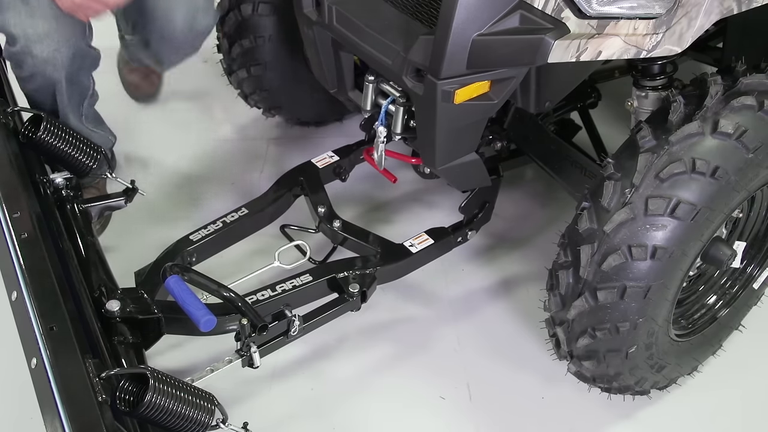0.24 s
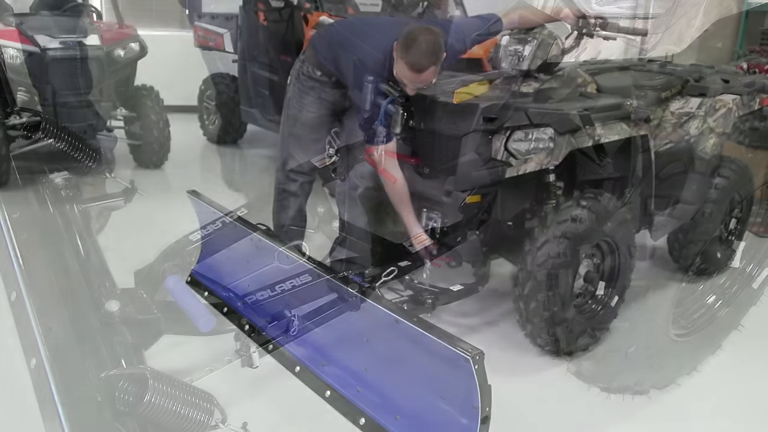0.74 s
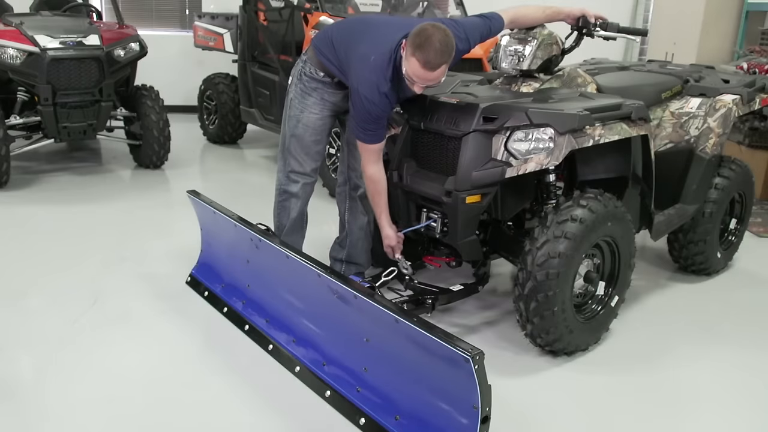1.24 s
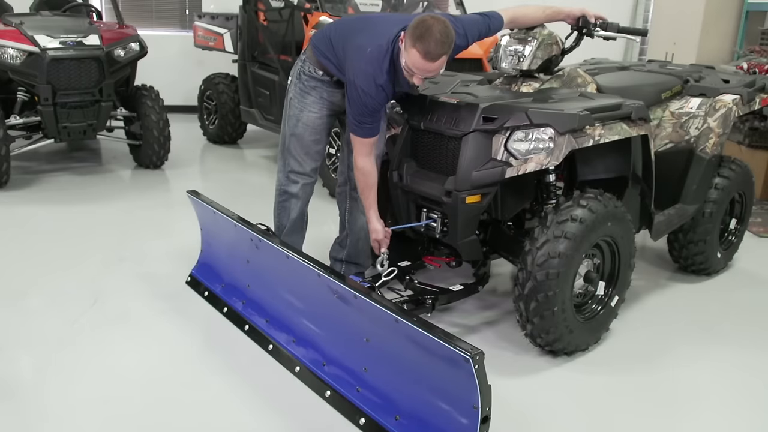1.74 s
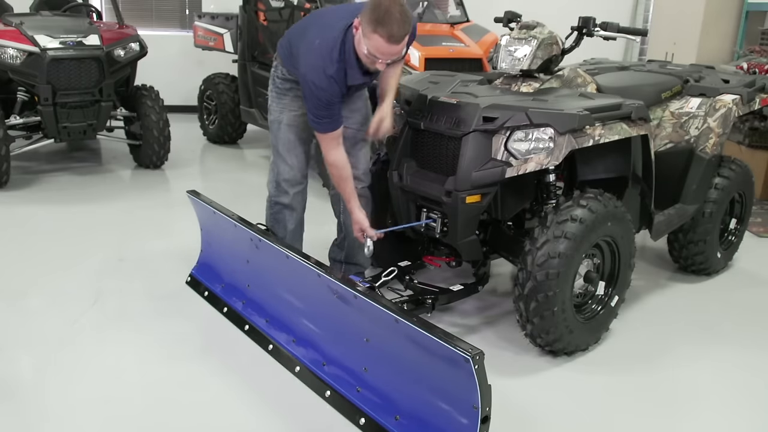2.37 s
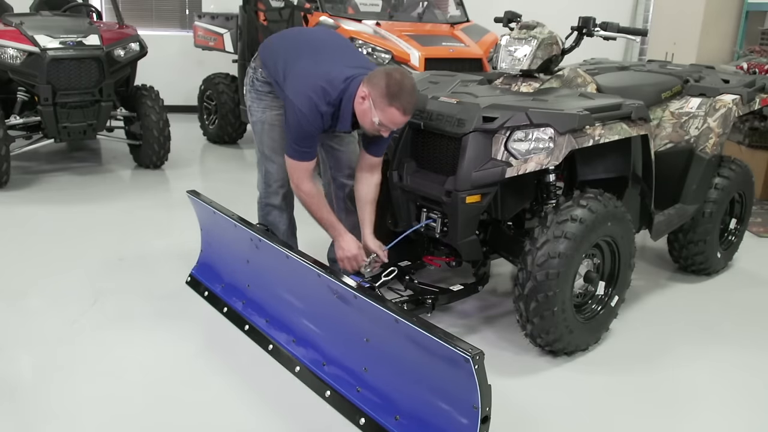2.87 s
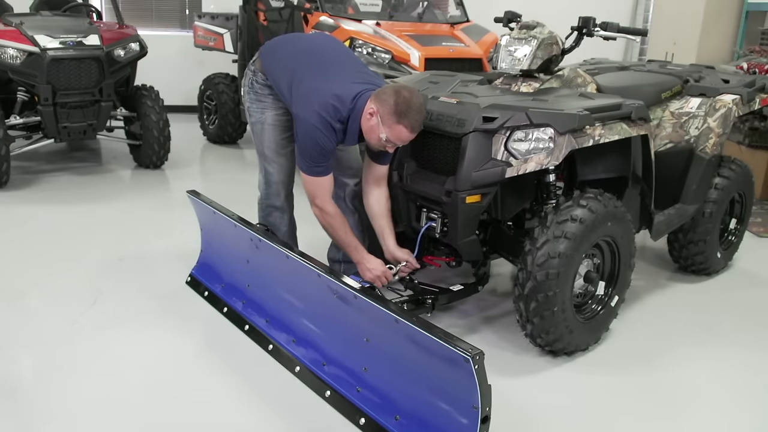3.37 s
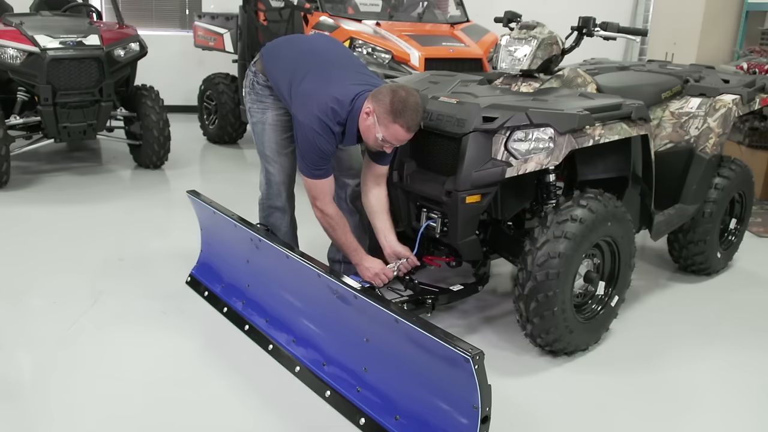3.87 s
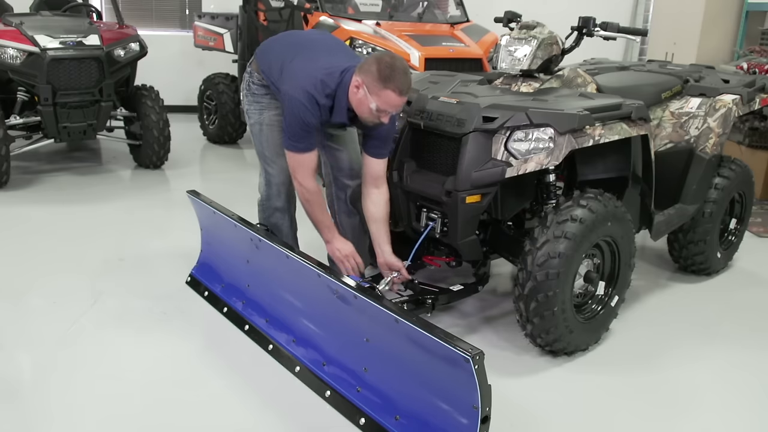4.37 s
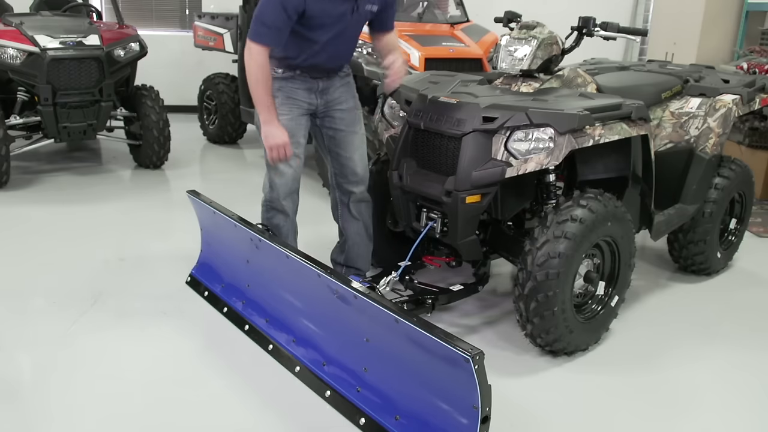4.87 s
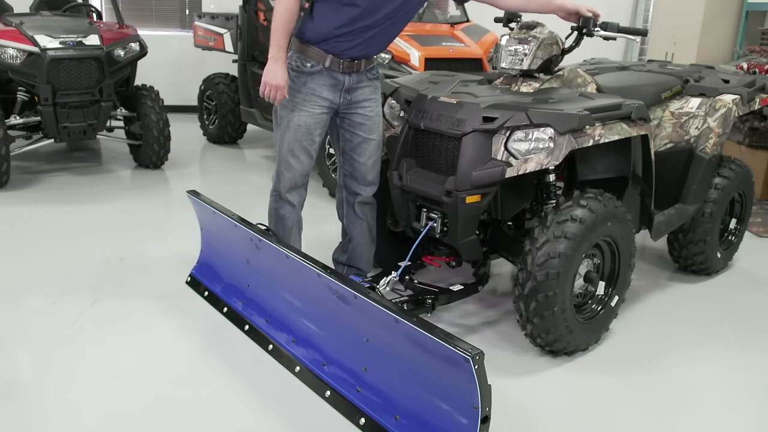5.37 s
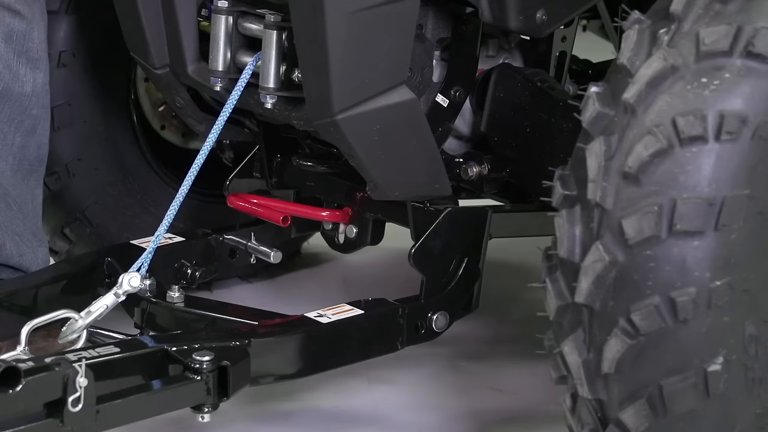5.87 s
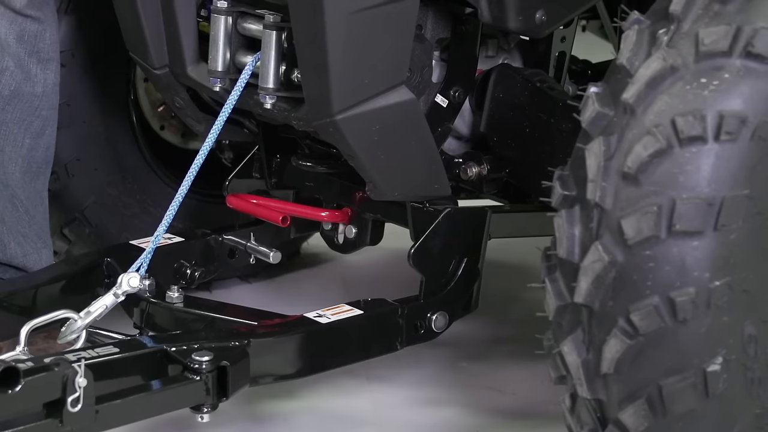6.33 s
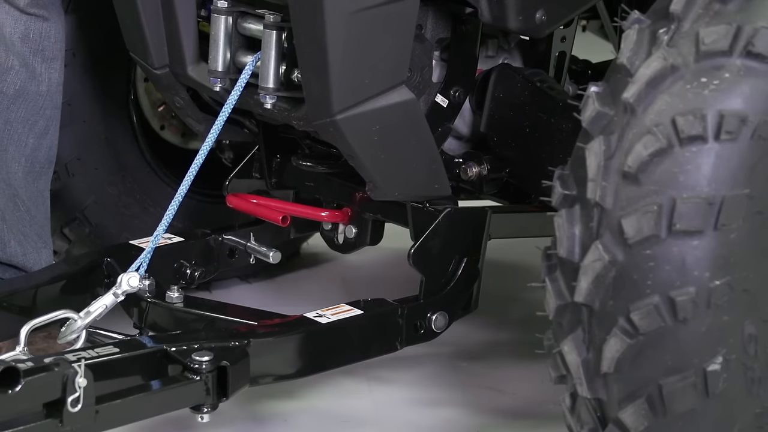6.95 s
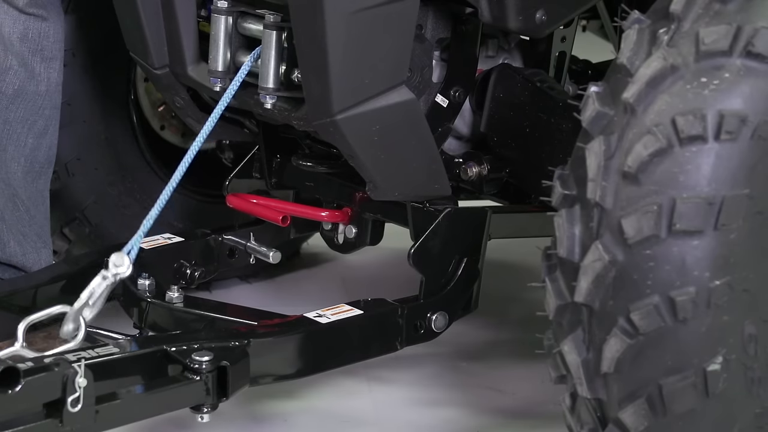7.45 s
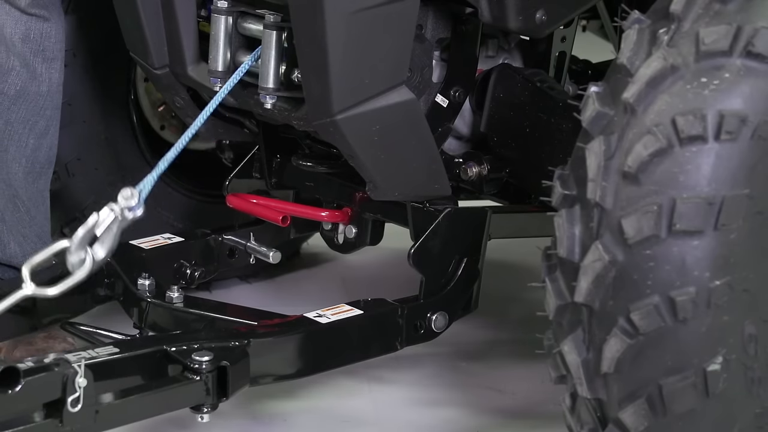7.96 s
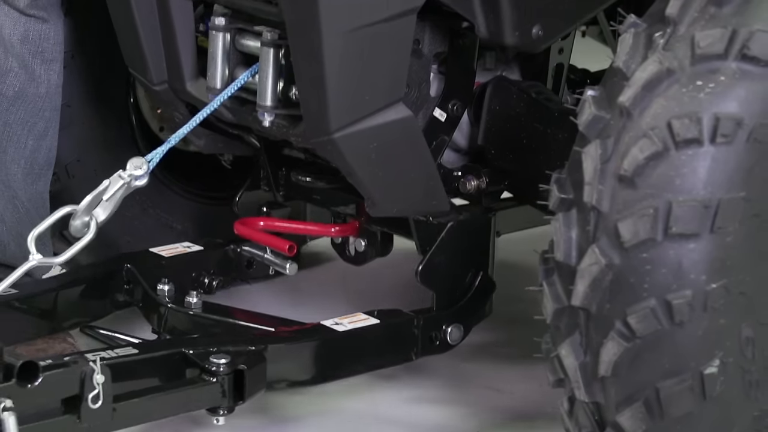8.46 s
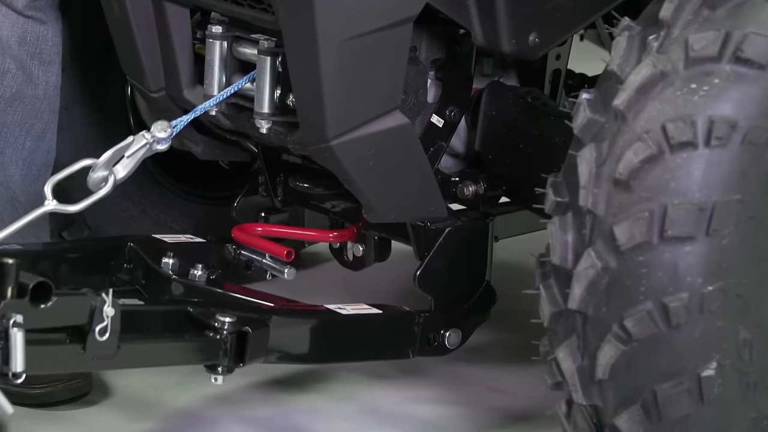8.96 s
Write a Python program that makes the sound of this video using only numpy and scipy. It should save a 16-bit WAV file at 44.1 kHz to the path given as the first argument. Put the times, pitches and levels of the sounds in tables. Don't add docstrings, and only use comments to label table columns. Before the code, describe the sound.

Ventilation rumbles while a winch motor whines and chatters, metal hook clanks and jingles, shoes shuffle, and the winch growls again under load.

```python
import sys
import numpy as np
from scipy import signal
from scipy.fft import rfft, irfft, next_fast_len
from scipy.io import wavfile
from scipy.ndimage import uniform_filter1d

SR = 44100
rng = np.random.default_rng(int(sys.argv[2]) if len(sys.argv) > 2 else 0)


def bounce(signal):
    frames = np.transpose(np.atleast_2d(signal))
    limited = np.clip(frames, -1, 1)
    pcm = np.round(limited * 32767).astype(np.int16)
    wavfile.write(sys.argv[1], SR, pcm)


def invert_db(level):
    return 10 ** (np.asarray(level, dtype=float) / 20)


N = 405719
T, SIZE = np.arange(N) / SR, next_fast_len(N)
HZ = np.fft.rfftfreq(SIZE, 1 / SR)


def evened(x):
    return x / np.sqrt(np.mean(x ** 2) + 1e-20)


def read(points, hz):
    f, value = np.transpose(points)
    return np.interp(np.log(hz + 1), np.log(f + 1), value)


def during(start, stop, rise=0.004, fall=0.008):
    return np.clip(np.minimum((T - start) / rise, (stop - T) / fall), 0, 1)


def coloured(db, x=None):
    source = rng.standard_normal(SIZE) if x is None else x
    return evened(irfft(rfft(source, SIZE) * invert_db(db), SIZE)[:N])


def band(lo_hz, hi_hz, ripple_db=0.0):
    edges_db = -10 * np.log10((1 + (lo_hz / (HZ + 1)) ** 8) * (1 + (HZ / hi_hz) ** 8))
    if not ripple_db:
        return coloured(edges_db)
    ripples = rng.standard_normal((2, len(HZ)))
    ripples = uniform_filter1d(uniform_filter1d(ripples, size=400), size=400)
    turn = 2 * np.pi * 1.3 * T
    shares = [np.cos(turn), np.sin(turn)]
    return sum(share * coloured(edges_db + ripple_db * evened(r)) for share, r in zip(shares, ripples))


def slow(rate_hz):
    knots = rng.standard_normal(int(N / SR * 200) + 2)
    smooth = uniform_filter1d(knots, max(1, round(100 / rate_hz)))
    return evened(np.interp(T * 200, np.arange(len(knots)), smooth))


def rung(drive, modes, uneven_db=0.0):
    out, shake = np.zeros(N), drive * rng.standard_normal(N)
    for hz, db, t60 in modes:
        r = np.exp(-np.log(1000) / (t60 * SR))
        angle = 2 * np.pi * hz / SR
        push = shake * invert_db(db + uneven_db * slow(8.2))
        gain = 2 * np.sqrt(1 - r * r) * np.sin(angle)
        out += signal.lfilter([gain], [1, -2 * r * np.cos(angle), r * r], push)
    return out / np.sqrt(2 * len(modes))


def add(mix, s, db, t60, rise=0.0012):
    part = mix[..., round(s * SR) - 40:][..., :round(0.3 * SR)]
    t = T[:part.shape[-1]]
    part += invert_db(np.asarray(db)[..., None] - 60 * t / t60) * (1 - np.exp(-(t / rise) ** 2))


# frequency in Hz, level in dB per Hz.
RUMBLE = [(15, -50), (25, -24.5), (48, -0.5), (129, -1), (456, -12.5), (2150, -30), (5000, -41),
          (11000, -120)]
# frequency in Hz, level in dB per Hz.
HISS = [(530, -23.5), (900, 0), (1720, -5.5), (2910, -5.5), (4940, -6), (10100, -8.5), (14500, -10.5),
        (15800, -14.5)]
# middle in seconds, half length in seconds, level in dB.
RUSTLE = [
    (0.15, 0.12, -59.5),
    (2.44, 0.085, -68),
    (2.655, 0.11, -64),
    (3.1, 0.5, -74),
    (4.597, 0.39, -72),
    (5.619, 0.06, -75),
    (6.002, 0.072, -74),
    (6.258, 0.053, -78.5),
    (6.511, 0.16, -75),
]
RUMBLE_DB, STILL_DB = -54, -71


def background():
    rumble = invert_db(RUMBLE_DB + 1.4 * slow(6.6)) * coloured(read(RUMBLE, HZ))
    flicker_db = 1.2 * slow(30)
    cloth = invert_db(STILL_DB) + sum(invert_db(db) * np.exp(-((T - s) / half) ** 4) for s, half, db in RUSTLE)
    return rumble + cloth * invert_db(flicker_db) * coloured(read(HISS, HZ))


TAUT_S, TAKE_UP_S, SETTLE_S = 8.2, 0.27, 0.086


def strain():
    load = np.clip((T - TAUT_S) / TAKE_UP_S, 0, 1)
    return load, load ** 2 * np.exp(-np.maximum(T - TAUT_S - TAKE_UP_S, 0) / SETTLE_S)


# start in seconds, stop in seconds, fade-in in seconds, gear whirr in dB, low growl in
# dB.
RUNS = [
    (0.21, 1.91, 0.6, -37, -36),
    (6.995, 8.945, 0.011, -37, -37),
]
# frequency in Hz, level in dB per Hz.
WHIRR = [
    [(710, -45.5), (1200, -31), (1730, 4), (2840, -1.5), (3070, -5), (3310, -0.5), (6450, 3.5),
     (15800, -19)],
    [(710, -38), (1200, -5.5), (2300, -12.5), (3500, -4.5), (4300, -1.5), (6600, -2), (9720, -7),
     (15800, -25.5)],
]
# frequency in Hz, level in dB per Hz.
GROWL = [(26, -45), (45, -3), (190, 1), (555, -1.5), (1100, -9), (1760, -10), (2600, -16.5), (5720, -110)]
# frequency in Hz, width in Hz, lift in dB paying out, lift in dB reeling in.
HOUSING = [(1027, 230, 9, 7.5), (1790, 180, 1, 5), (2997, 120, 8, 5), (3990, 130, 7, 3.5),
           (4420, 130, 6.5, 7), (5060, 260, 8.5, 6.5), (2650, 400, -1, -4), (5700, 350, -1, -4),
           (6300, 220, 2, 8), (6550, 150, 1.5, 8), (7380, 70, 9, 10.5), (7700, 150, -2, 3),
           (8470, 41, 4, 3), (9140, 91, -2, -3.5)]
# multiple of shaft speed, level in dB re growl.
ORDERS_DB = [(1, -4), (3, -12), (4, -11), (6, -9), (7, -10), (8, -13), (16, -8)]
FREE_HZ = [62.94, 63.4]
SAG_HZ = 7.3
INRUSH_DB, INRUSH_S = 9.5, 0.063
BUMP_S, BUMP_DB, BUMP_WIDTH_S = 1.2, 2, 0.11
LOAD_WHIRR_DB, LOAD_GROWL_DB, LURCH_WHIRR_DB, LURCH_GROWL_DB = 3, 3.5, 2.5, 9


def motor():
    out = np.zeros(N)
    load, lurch = strain()
    bump_db = BUMP_DB * np.exp(-((T - BUMP_S) / BUMP_WIDTH_S) ** 2)
    for k, (start, stop, swell, whirr_db, growl_db) in enumerate(RUNS):
        turns = np.cumsum((FREE_HZ[k] - SAG_HZ * load) * (1 + 0.0045 * slow(4.6))) / SR
        lift_db = sum(row[2 + k] / (1 + ((HZ - row[0]) / (row[1] / 2)) ** 2) for row in HOUSING)
        throb = 1 + 0.14 * np.cos(2 * np.pi * turns)
        mesh = rng.standard_normal(N) * throb * invert_db(2.2 * slow(37))
        whirr = coloured(read(WHIRR[k], HZ) + lift_db, mesh)
        orders = sum(invert_db(db + 2.2 * slow(9)) * np.sin(2 * np.pi * m * turns) for m, db in ORDERS_DB)
        orders = 0.36 * orders / invert_db(LURCH_GROWL_DB * lurch + 4 * load)
        growl = coloured(read(GROWL, HZ) + lift_db) + orders
        inrush_db = INRUSH_DB * np.exp(-abs(T - start) / INRUSH_S)
        whirr_db = whirr_db + bump_db + LOAD_WHIRR_DB * load + LURCH_WHIRR_DB * lurch
        growl_db = growl_db + bump_db + LOAD_GROWL_DB * load + LURCH_GROWL_DB * lurch + inrush_db
        running = during(start, stop, swell, 0.02)
        out += running * (invert_db(whirr_db - 1.5) * whirr + invert_db(growl_db - 3) * growl)
    return out


# multiple of the bar rate, level in dB.
WHINE = [(6, -53), (8, -53), (9, -63), (12, -63), (13, -62), (14, -63)]
BARS_HZ = 497.6
WHINE_DB, WHINE_WAVER_DB = -3.5, 3.5


def whine():
    turns = np.cumsum(BARS_HZ * (1 + 0.0012 * slow(8))) / SR
    lines = sum(invert_db(db + WHINE_WAVER_DB * slow(12)) * np.sin(2 * np.pi * m * turns) for m, db in WHINE)
    return during(*RUNS[0][:3], 0.02) * invert_db(WHINE_DB) * lines


# time in seconds, peak in dB.
TEETH = [(0.4026, -31.5), (0.4839, -32), (0.6235, -29), (0.644, -29), (0.675, -24), (0.7074, -30),
         (0.8192, -29.5), (0.867, -31), (0.895, -26), (0.9608, -27), (0.981, -21.5), (1.0097, -23),
         (1.122, -24.5), (1.141, -24.5), (1.2068, -27), (1.2337, -21), (1.2851, -17), (1.319, -23.5),
         (1.397, -21), (1.4203, -24), (1.4801, -22.5), (1.56, -23.5), (1.6203, -28.5), (1.6403, -24),
         (1.7251, -26), (1.783, -21.5), (1.8944, -17.5)]
# time in seconds, peak in dB.
TEETH_IN = [(7.2, -31), (7.2873, -22.5), (7.3661, -27), (7.4424, -25), (8.0823, -28), (8.2136, -26)]
# frequency in Hz, level in dB, t60 in seconds.
GEARS = [(6480, 6, 0.011), (7090, 2, 0.02), (8000, -12, 0.024), (8850, -15, 0.018), (9400, -4, 0.033)]


def teeth():
    blows = np.zeros((2, N))
    for s, db in TEETH + TEETH_IN:
        tilt_db = rng.normal(0, 2.8)
        add(blows, s, [db - 9.5 + tilt_db, db - 34.5 - tilt_db], 0.06)
    rasp = 1.1 * blows[0] * band(6360, 7800) + 0.74 * rung(blows[0], GEARS, 0.74)
    return rasp + blows[1] * band(9000, 17500)


# time in seconds, peak in dB, thud and bright in dB re peak, t60 in seconds.
KNOCKS = [
    (1.0497, -10.5, -9.5, -10, 0.12),
    (1.086, -11.5, -12, -19, 0.053),
    (1.177, -10, -8, -13.5, 0.062),
    (1.206, -19.5, -1.5, -14.5, 0.24),
    (1.8946, -15.5, -1, -1.5, 0.13),
    (1.908, -5, -14, -18, 0.039),
]
# time in seconds, peak in dB, thud and bright in dB re peak, t60 in seconds.
LIFT_KNOCKS = [(6.987, -12, -7, -2.5, 0.14), (7.618, -29, 4, 4, .15), (7.664, -18, -5, 0.5, .05),
               (7.69, -23, -8, -1, 0.15), (7.701, -24, -3, 3, .12), (8.2613, -13, -4, -20, 0.098),
               (8.348, -15, -8, -9.5, 0.093), (8.3539, -10, -5, -9, 0.23), (8.397, -20, 5, -3, 0.21),
               (8.5, -25, 2, -12, .1), (8.924, -18.5, -3, -3.5, 0.092)]
# time in seconds, peak in dB, thud and bright in dB re peak, t60 in seconds.
HOOK_KNOCKS = [(3.386, -13.5, -4.5, -2, 0.1), (3.423, -32, -3, -10.5, 0.48), (3.457, -34, -2.5, -5.5, 0.28),
               (3.555, -19.5, -4, -4.5, 0.042), (3.8847, -16, -2.5, -10, .12), (3.927, -28, -3.5, -4, 0.15),
               (3.951, -12.5, 3, -4, 0.051), (3.959, -15, -3.5, 3, 0.17), (4.1245, -21.5, 0, -7.5, 0.24),
               (4.184, -27.5, -4, 2, 0.071), (4.2242, -16, -2.5, -7, 0.27), (4.282, -20.5, -3.5, 0, .1),
               (4.3026, -15.5, -0.5, -5.5, 0.13), (4.3307, -12.5, -1, 2, 0.049), (4.4, -20, -6, 0, 0.07),
               (4.487, -14.5, -2, 1.2, 0.1)]
# time in seconds, peak in dB, thud and bright in dB re peak, t60 in seconds.
TICKS = [
    (3.7942, -31, -7.5, 0, .055),
    (3.824, -24.5, -4, -2.5, 0.04),
]
# time in seconds, peak in dB, thud and bright in dB re peak, t60 in seconds.
SLIPS = [(3.644, -40.5, 0.5, -15, .08), (3.656, -39, -2, -8, .08), (3.668, -32, -4, -16, .08),
         (3.683, -22.5, -3, -12, .08), (3.695, -18, -7, -12, 0.086), (3.706, -17, -8, -13, 0.077),
         (3.717, -17.5, -8, -12, .08), (3.728, -17.5, -7.5, -11, 0.073), (3.738, -20, -5, -12, 0.071),
         (3.749, -26, -3.5, -13, .1), (3.76, -35, 2, -12, .15)]
FIZZ_DB = [-19, -7, -19.5, 2, -21, -18]
RISE_S = [.0025, 0.0055, .0045, .001, .002]
# start in seconds, length in seconds, scrape in dB, thud and bright in dB re scrape.
STROKES = [
    (4.13, 0.18, -37, 4, 11.4),
    (4.2, .27, -33, 1, 5.5),
    (7.606, 0.066, -25, 0, 6.5),
]
# from in seconds, to in seconds, level in dB.
HANDLED = (3.39, 4.55, -47)
# frequency in Hz, level in dB, t60 in seconds.
PLATES = [(1170, -8, 0.033), (1735, 1.5, 0.029), (2120, -5, 0.05), (2535, -3, 0.06), (2775, -0.5, .09),
          (3090, -11.5, 0.041), (3690, -1.5, 0.047)]
# frequency in Hz, level in dB, t60 in seconds.
FRAME = [(188, -9, 0.42), (279, -1.5, 0.2), (353, -10, 0.073), (379.7, -1, .2), (452.5, 0.5, 0.05),
         (527, -6, 0.3), (617, -7, 0.31), (716, -3, 0.2)]
# frequency in Hz, level in dB, t60 in seconds.
HOOK = [(4390, -1, .08), (4490, 1, 0.083), (4810, 4.5, 0.08), (5050, 1.5, .08), (5410, 2, 0.075),
        (5980, 4.5, 0.05), (6460, 2.5, 0.04), (6670, -1, .06), (7430, 5, 0.05), (7845, 5.5, 0.06),
        (8100, 2, .04), (8400, -4.5, .08), (8850, -2, .05), (9421, -6.5, .05)]
# frequency in Hz, level in dB, t60 in seconds.
MOUNT = [(2070, -8.5, .05), (2490, -9.5, 0.072), (2870, -6.5, .06), (3150, -8, 0.046), (3530, -7, .08),
         (3750, -7, 0.058), (4170, -8, 0.059), (4396, -3.5, .07), (4860, -0.5, .04), (5305, -4.5, 0.057),
         (5790, -5, 0.036), (6450, -1, 0.023), (7060, -2, 0.046), (7730, -4.5, .06)]
FIZZ_PER_DB = 2.5
STROKE_PEAK, STROKE_ENDS_DB = 0.33, -10


def steel():
    drive = np.zeros((4, N))
    for rows, fizz_db, rise in zip([KNOCKS, LIFT_KNOCKS, HOOK_KNOCKS, TICKS, SLIPS], FIZZ_DB, RISE_S):
        for s, db, thud_db, bright_db, t60 in rows:
            top_db = bright_db + fizz_db + FIZZ_PER_DB * (db + 12.5)
            add(drive, s, db - 5.5 + np.array([-4, thud_db, bright_db, top_db]), t60, rise)
    for s, length, db, thud_db, bright_db in STROKES:
        press_db = STROKE_ENDS_DB * np.interp((T - s) / length, [0, STROKE_PEAK, 1], [1, 0, 1]) ** 2
        grip_db = 1.6 * slow(100)
        gain = during(s, s + length, 0.051, 0.018) * invert_db(db + press_db - 7.5 + grip_db)
        parts_db = np.array([[0], [thud_db], [bright_db], [bright_db + FIZZ_DB[-1]]])
        drive += gain * invert_db(parts_db + np.outer([0.62, 0.3, 0.486, 0.8], press_db))
    drive[1] += during(*HANDLED[:2], 0.02, 0.16) * invert_db(HANDLED[2])
    hooking = during(3, 5)
    clank = 0.8 * drive[0] * band(1200, 4000, 4.0) + 0.7 * rung(drive[0] * hooking, PLATES, 2.2)
    thud = 0.52 * drive[1] * band(100, 800) + 0.82 * rung(drive[1], FRAME, 3.2)
    clink = 1.04 * drive[2] * band(4000, 8900, 3.7) + 0.51 * rung(drive[2] * hooking, HOOK, 2.2)
    mount = rung((0.78 * drive[0] + 0.39 * drive[2]) * (1 - hooking), MOUNT, 2.2)
    fizz = drive[3] * band(8800, 16000, 3.0)
    return clank + thud + clink + mount + fizz


# time
# in seconds, frequency in Hz, level in dB, t60 in seconds.
CLINKS = [(1.052, 2070, -25.5, .12), (1.051, 2490, -31.5, .1), (1.088, 2070, -28, .08),
          (1.177, 3100, -32, 0.068), (1.194, 3165, -34, .06), (3.39, 5860, -26, .07),
          (3.392, 4500, -30, .1), (3.394, 7445, -26, .1), (3.394, 8592, -32, .1), (3.39, 2767, -39, .4),
          (3.423, 1760, -38.5, .1), (3.465, 6686, -42, .08), (3.558, 4800, -39, 0.096),
          (3.558, 6150, -37, 0.053), (3.558, 7900, -38.5, 0.055), (3.668, 1782, -39, 0.098),
          (3.727, 2616, -30.5, .1), (3.727, 3531, -30.5, .12), (3.795, 3900, -38, .1),
          (3.964, 8110, -20, .1), (3.964, 7490, -25, .12), (3.966, 8850, -26, .15), (3.964, 6750, -31, .12),
          (7.609, 3170, -36, .15), (7.628, 3170, -33, .2), (7.625, 5790, -29, .15),
               (7.63, 7830, -31, .15), (7.635, 6500, -23, .1), (7.625, 1780, -32, .2),
               (8.358, 7720, -27, .15), (8.358, 2870, -34, .15), (9.018, 1890, -34, .07),
               (9.022, 520, -28, .3), (9.021, 250, -19.5, .09), (9.022, 640, -24, .06),
               (9.028, 361, -29, .3), (9.062, 490, -28, .15), (8.263, 797, -30, .12),
               (8.263, 1130, -30, .1), (8.264, 1367, -32, .09), (8.264, 1760, -32, .09),
               (8.272, 436, -30, .15), (6.992, 404, -28, .3), (6.99, 587, -31, .3), (6.99, 824, -28, .06),
               (6.99, 1448, -29, .05), (6.966, 2000, -50, .05), (3.555, 1480, -34, .1),
               (3.556, 2080, -39, .07), (4.335, 3500, -27, .06), (4.195, 7840, -30, .12),
               (4.282, 6100, -29, .06), (4.296, 7490, -26, .1), (4.31, 8110, -27.5, .1),
               (4.402, 6750, -26, .05)]
# time in seconds, frequency in Hz, level in dB, t60 in seconds.
THUMPS = [(1.905, 60, -39, 0.97), (1.91, 112, -38, 0.88), (2.47, 82, -41.5, .3), (2.589, 110, -46, 0.27),
          (4.76, 80, -42.5, .2), (4.795, 88, -32.5, .25), (4.865, 75, -40.5, .2), (5.575, 180, -39.5, .2),
          (5.58, 130, -42, .3), (5.76, 105, -51.5, .3), (8.36, 95, -28, .9), (8.36, 222, -27, .3),
          (9.03, 95, -33, .6), (8.272, 555, -26, .2)]
# frequency in Hz, level in dB re slip, t60 in seconds.
SLIP_TICK = (14380, -24.5, .03)


def struck():
    out, t = np.zeros(N), T[:round(0.5 * SR)]
    tick_hz, tick_db, tick_t60 = SLIP_TICK
    flicks = [(row[0], tick_hz, row[1] + tick_db, tick_t60) for row in SLIPS]
    for s, hz, db, t60 in CLINKS + THUMPS + flicks:
        swell = np.minimum(t / (0.002 + 1.2 / hz), 1)
        note = swell * invert_db(db - 60 * t / t60) * np.sin(2 * np.pi * hz * t)
        part = out[round(s * SR):][:len(t)]
        part += note[:len(part)]
    return out


# time in seconds, frequency in Hz, level in dB, length in seconds, t60 in seconds.
BOOMS = [(1.056, 712, -31, 0.058, 0.35), (1.059, 383, -34, 0.064, 0.6), (1.182, 716, -33.5, 0.083, 0.82),
         (1.9, 942, -27, 0.019, 0.074), (1.905, 1630, -30, .02, 0.24), (1.941, 292, -41.5, 0.178, 0.53),
         (3.69, 188, -38, 0.37, 0.47), (3.966, 2775, -37, 0.036, 0.33), (4.49, 3950, -27, 0.012, 0.08),
         (8.263, 2970, -28, 0.012, 0.06), (8.356, 3110, -21, 0.0056, 0.36), (8.355, 163, -19, 0.029, 0.37),
         (8.395, 400, -23.5, 0.08, 0.77), (6.98, 83, -35, .03, .15), (6.991, 1028, -27.5, 0.0069, 0.26),
         (9.02, 208.3, -36, 0.11, 0.56), (3.955, 105, -24.5, 0.018, 0.11), (3.555, 1717, -35, 0.0095, 0.1)]
# time in seconds, frequency in Hz, level in dB, length in seconds.
JINGLES = [(3.39, 12671, -38, .015), (3.554, 11920, -50, .015), (3.554, 14380, -47, .005),
           (3.96, 14462, -38, .02), (4.153, 7348, -34, .05), (4.2, 7348, -29, .13),
           (4.182, 11925, -39, .04), (4.265, 11925, -37, .035), (4.405, 5400, -29, .025),
           (4.19, 13925, -33.5, .1), (4.218, 14364, -31.5, .02), (4.235, 9470, -25, 0.041),
           (4.262, 14380, -22.5, .035), (4.297, 9405, -18, .015), (4.295, 4844, -28, .065),
           (4.31, 13370, -41, .11), (4.31, 12663, -45.5, .1), (4.322, 14433, -31.5, .01),
           (4.345, 14433, -33, .05), (4.345, 11927, -36, 0.075), (4.365, 5368, -26, 0.057),
           (4.37, 6145, -33, .04), (4.3, 5790, -30.5, .12), (4.487, 13958, -47.5, 0.055),
           (7.619, 9420, -28, 0.046), (7.627, 12678, -29, .032), (7.63, 13945, -41.5, 0.07),
           (7.62, 13316, -45, .09), (7.622, 7347, -30.5, .04), (7.625, 11925, -38, .035),
           (7.583, 9700, -40, 0.035)]
# frequency in Hz, t60 in seconds.
LATCH = [(9400, .08), (11900, .13), (13320, .11), (13930, .24), (14360, .1)]


def ringing():
    out, t = np.zeros(N), T[:round(0.6 * SR)]
    waver_db, drift = 2.2 * slow(40) - 2.5, 0.15 * slow(30)
    jingles = [row + (read(LATCH, row[1]),) for row in JINGLES]
    for k, (s, hz, db, length, t60) in enumerate(jingles + BOOMS):
        own = slice(k * 4000, k * 4000 + len(t))
        fall_db = 80 * np.maximum(t - length, 0) / t60
        held = np.clip(t / 0.0033, 0, 1) * invert_db(db - fall_db + waver_db[own])
        note = held * np.sin(2 * np.pi * (hz * t + drift[own]))
        part = out[round(s * SR):][:len(t)]
        part += note[:len(part)]
    return out


# time in seconds, peak in dB, centre in Hz, t60 in seconds.
STEPS = [
    (2.37, -31.5, 130, 0.16),
    (2.634, -40.5, 696, 0.073),
    (5.586, -40, 300, 0.1),
    (6.208, -34, 97, 0.2),
    (9.019, -24, 370, 0.15),
    (9.065, -30, 300, .9),
    (9.03, -26, 113, 0.61),
    (6.712, -36, 496, 0.047),
]
# time in seconds, peak in dB, centre in Hz, t60 in seconds.
TAPS = [
    (2.1, -51, 11800, 0.063),
    (3.0724, -43, 4200, 0.037),
    (6.8194, -62, 13940, 0.059),
    (6.977, -30, 800, 0.04),
    (3.794, -21, 13500, .045),
    (6.966, -36, 7000, 0.025),
    (3.376, -44.5, 4000, .03),
    (6.979, -10, 5500, 0.026),
]
# start in seconds, length in seconds, from in Hz, to in Hz, level in dB.
SQUEAKS = [
    (6.87, 0.11, 13850, 15000, -67),
    (6.89, 0.096, 11500, 12000, -75),
    (5.38, .07, 12300, 15000, -74),
    (5.45, .04, 15000, 13600, -76),
]


def small_sounds():
    out = np.zeros(N)
    for s, db, hz, t60 in STEPS + TAPS:
        part = out[round(s * SR):][:round(0.3 * SR)]
        blow = np.zeros_like(part)
        add(blow, 0.001, db - 8.0, t60, 0.003)
        edges_hz = [0.73 * hz, min(2.0 * hz, 20000)]
        sos = signal.butter(2, edges_hz, "bandpass", fs=SR, output="sos")
        part += blow * evened(signal.sosfilt(sos, rng.standard_normal(len(blow))))
    for s, length, from_hz, to_hz, db in SQUEAKS:
        hz = np.interp(T, [s, s + length], [from_hz, to_hz]) * (1 + 0.006 * slow(50))
        level = during(s, s + length, 0.02, 0.0063) * invert_db(db + 3.8 * slow(50))
        out += level * np.sin(2 * np.pi * np.cumsum(hz) / SR)
    return out


# frequency in Hz, level in dB,
# t60 in seconds.
LOADED = [(115, -0.5, 0.45), (164, -0.5, 0.27), (388, -13.5, 0.093), (499, -6.5, 0.79), (639, -9, 0.23)]
SHAKE_S, SHAKE_DB, LURCH_SHAKE_DB, JOLT_DB = 8.35, -25, 5.5, -9


def lifted_frame():
    jolt = invert_db(JOLT_DB - 1000 * abs(T - SHAKE_S))
    shake = invert_db(SHAKE_DB + LURCH_SHAKE_DB * strain()[1] ** 0.5) + jolt
    hanging = during(SHAKE_S, RUNS[-1][1], 0.0072, 0.0011)
    return 1.21 * rung(hanging * shake * invert_db(-10.5), LOADED)


# frequency in Hz, t60 in seconds.
HALL = [(100, 0.79), (400, 1.98), (1500, 1.54), (4000, 1.3), (8000, 0.62), (14000, 0.6)]


def hall(x):
    hz, t, z = signal.stft(rng.standard_normal(round(1.6 * SR)), SR, nperseg=256)
    tail = signal.istft(z * invert_db(-60 * t / read(HALL, hz)[:, None]), SR, nperseg=256)[1]
    tail *= np.clip(T[:len(tail)] / 0.012 - 1, 0, 1)
    return signal.fftconvolve(x, tail / np.linalg.norm(tail))[:N]


def scene():
    winch = motor() + teeth() + whine()
    metal = steel() + lifted_frame() + small_sounds()
    notes = ringing() + struck()
    echo = hall(invert_db(-5.0) * winch + invert_db(-16.0) * metal + invert_db(-16.0) * notes)
    mono = winch + metal + notes + echo + background()
    return np.array([mono, mono])


def roll_off(x):
    return signal.sosfilt(signal.butter(12, 16650, fs=SR, output="sos"), x)


# frequency in Hz, gain in dB.
MICROPHONE = [(20, -35.5), (52, -1), (15650, 0.5), (15900, -35)]


def record(dry):
    rounded = dry / (1 + (dry / 0.42) ** 4) ** 0.25
    heard = irfft(rfft(rounded, SIZE) * invert_db(read(MICROPHONE, HZ)), SIZE)[:, :N]
    return roll_off(heard)


dry = scene()
out = record(dry)
bounce(out)
```